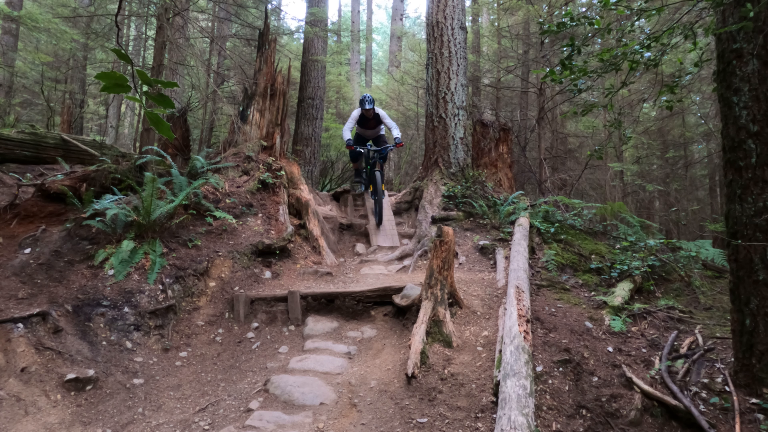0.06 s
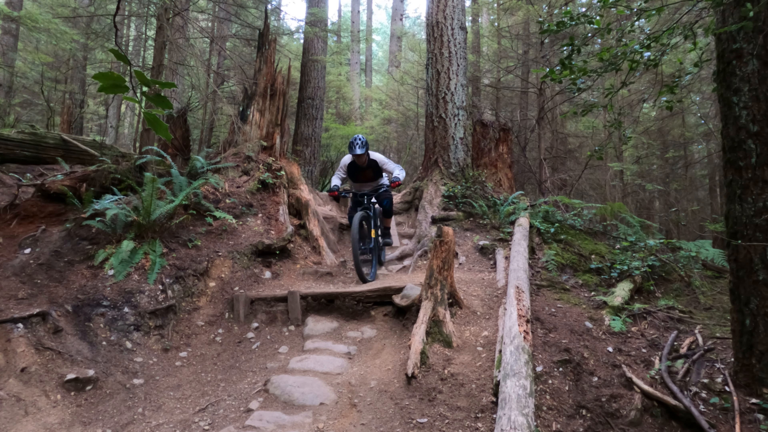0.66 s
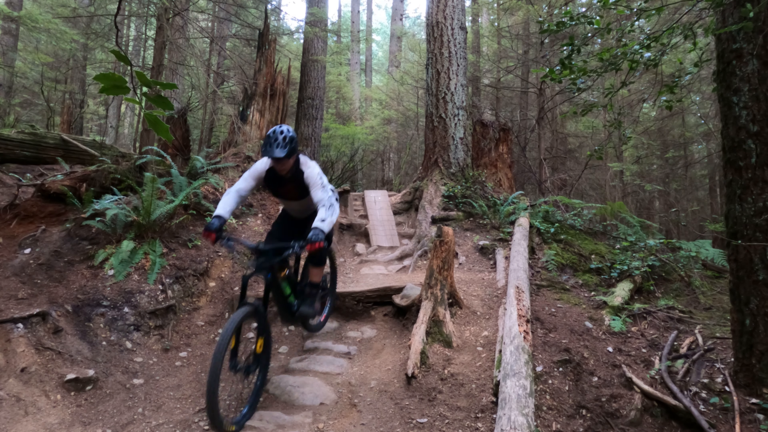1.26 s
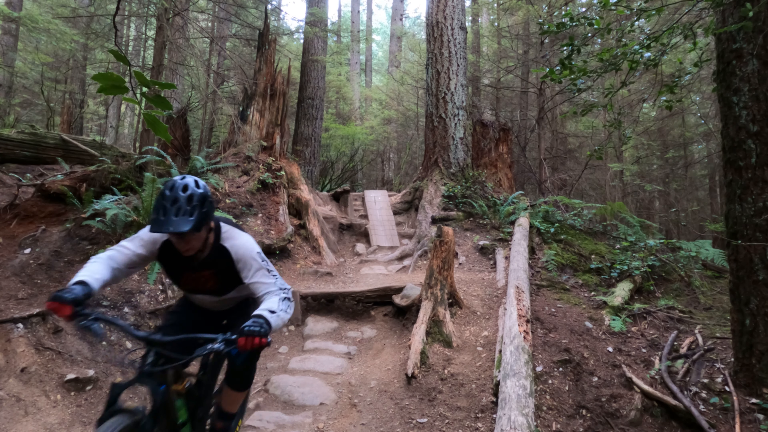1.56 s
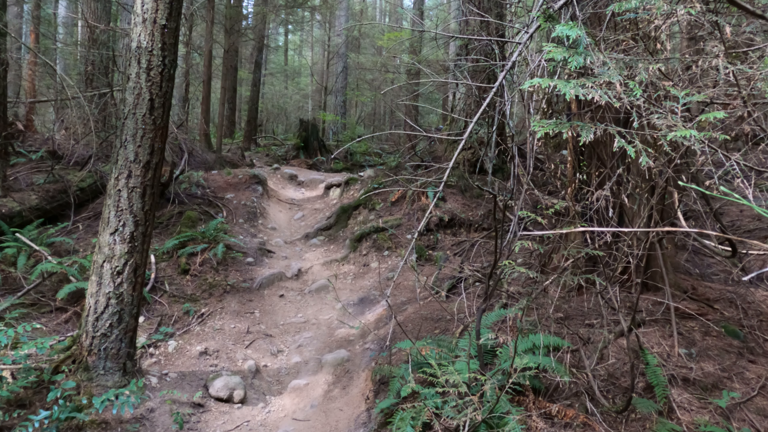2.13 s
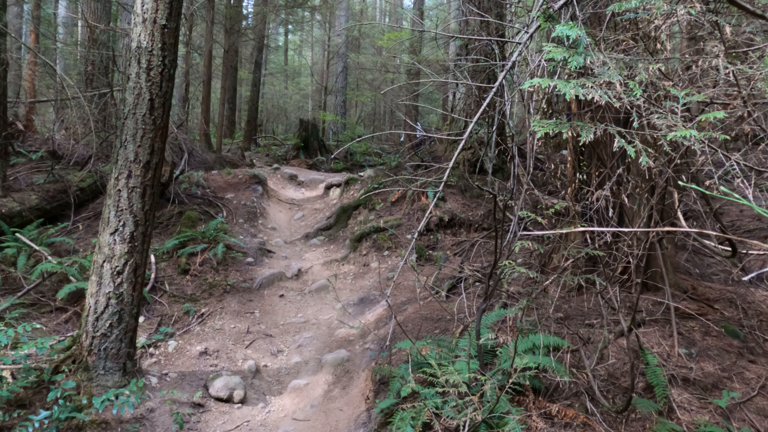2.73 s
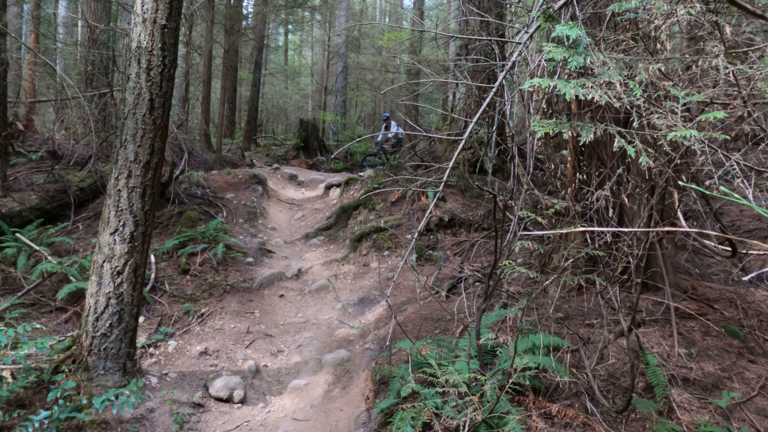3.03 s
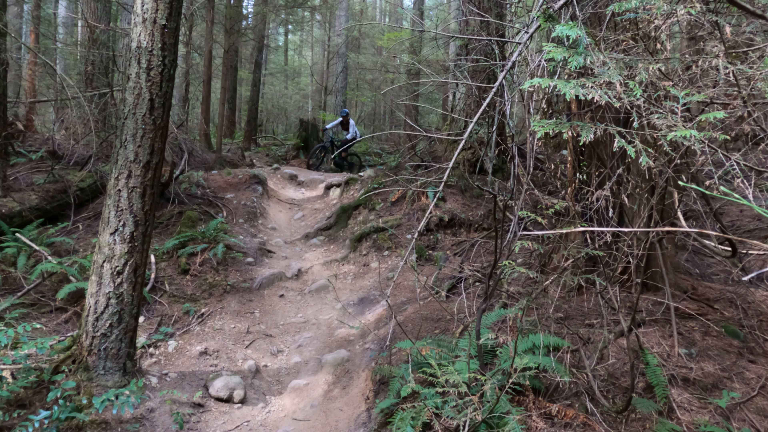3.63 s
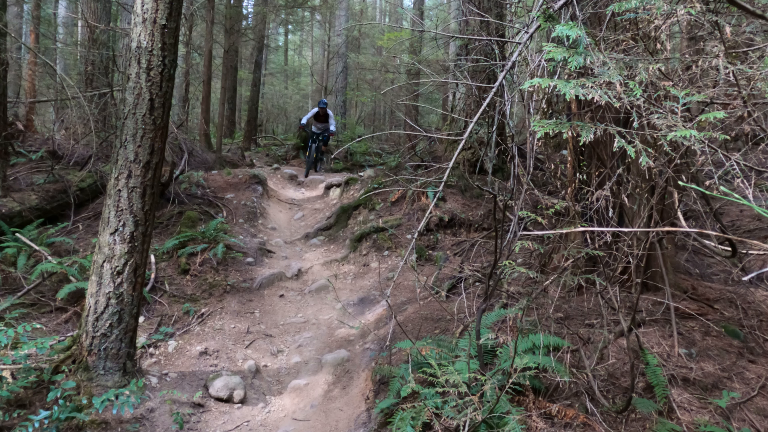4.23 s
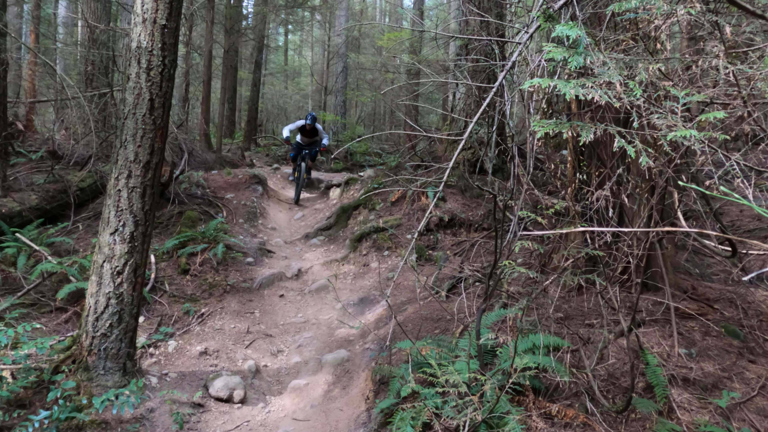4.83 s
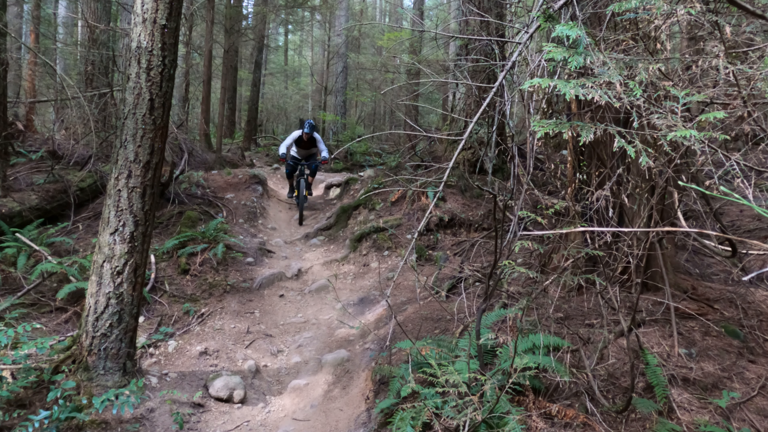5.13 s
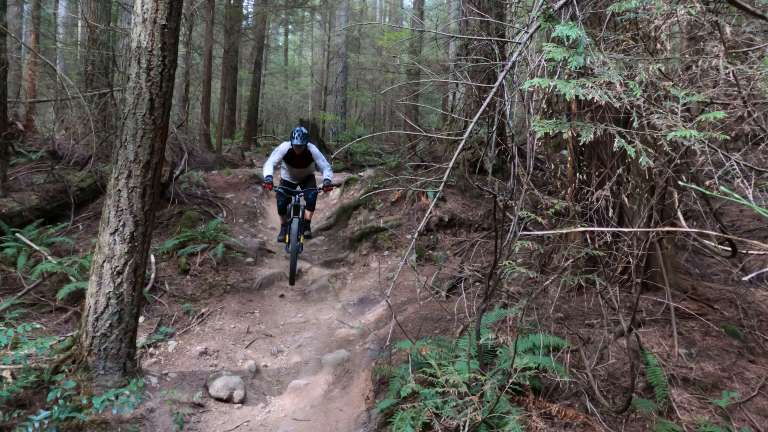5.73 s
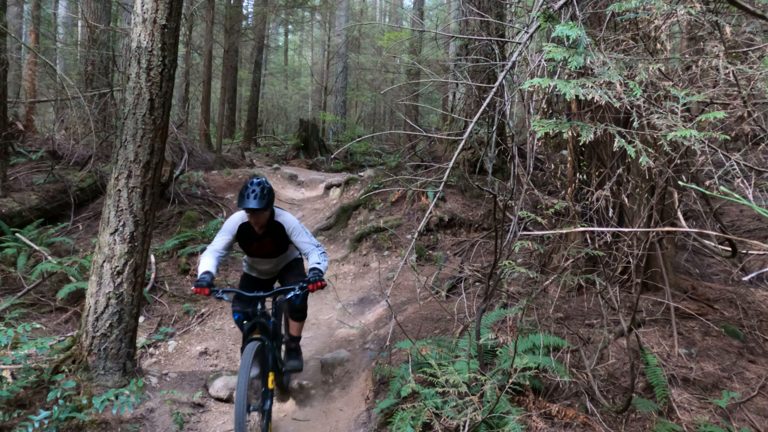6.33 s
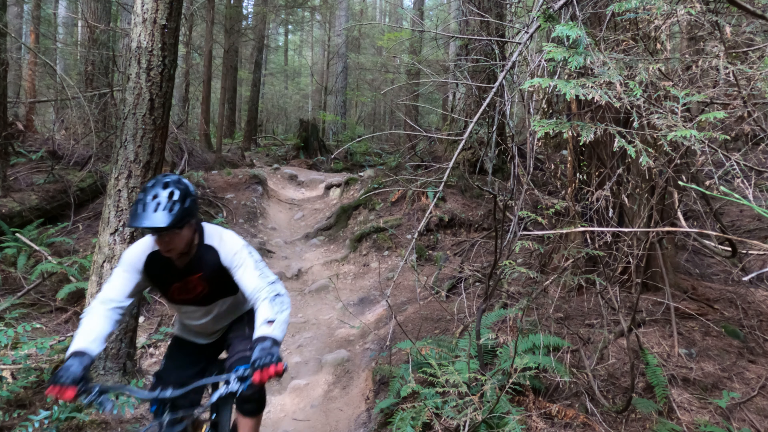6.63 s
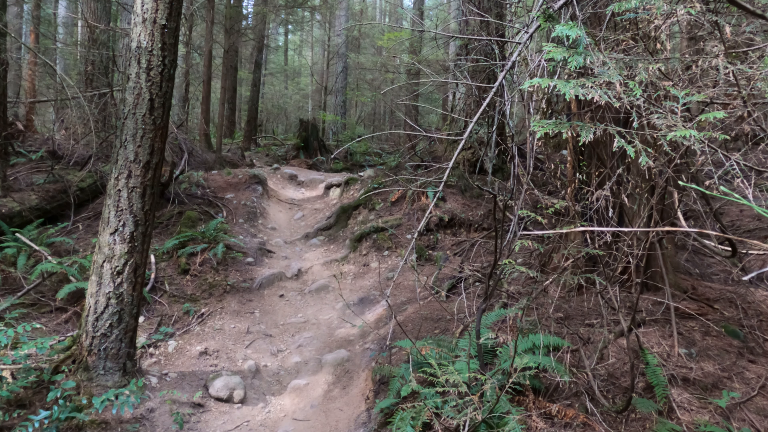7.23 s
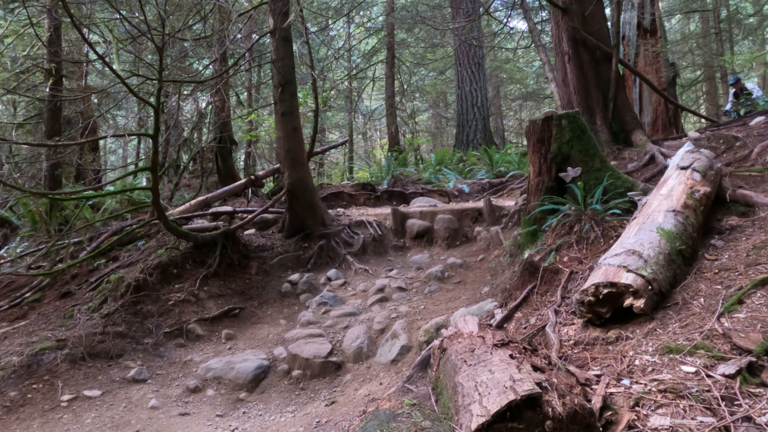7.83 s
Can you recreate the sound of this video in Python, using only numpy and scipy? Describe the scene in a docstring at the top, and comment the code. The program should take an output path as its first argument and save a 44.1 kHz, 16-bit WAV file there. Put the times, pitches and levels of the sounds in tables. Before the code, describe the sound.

A mountain bike coasts closer in a quiet forest, its hub ticking rapidly and its knobbly tyres humming briefly on a plank. From about 0.5 seconds the wheels knock on wood and crunch onto dirt. Between 1.4 and 2 seconds it passes close on the left, loud with deep thuds, short scuffs, clinks and the chain slapping the frame. A sudden cut at 2.1 seconds drops to forest hush, with a faint, distant landing and patter of dirt around 2.4. From about 3.2 seconds the buzzing hub emerges far away, and a brake chirps faintly at 4.1. From 4.7 seconds tyre crunch, rumble and chain clatter build steadily, peaking with heavy thumps around 6.8 to 7.1 as the bike passes on the left again. At 7.4 seconds another cut leaves only soft forest air and a far, low drone until about 8 seconds.

```python
"""First come knobbly tyres humming on a plank and the ticking hub of a mountain bike in a quiet forest.
The bike coasts closer and passes on the left: tyres crunch and scuff, wheels thud on the ground, and
the chain slaps the frame. After a sudden cut at about 2 s it comes out from behind the trees, its
brake chirps, and it passes again. A second cut leaves only the forest and a far, low drone."""
import sys
import numpy as np
from scipy import signal
from scipy.fft import rfft, irfft, next_fast_len
from scipy.io import wavfile
from scipy.ndimage import uniform_filter1d

SR = 44100
rng = np.random.default_rng(int(sys.argv[2]) if len(sys.argv) > 2 else 0)


def transcribe(signal):
    """Save signal, clipped to [-1, 1], as a 16-bit WAV file at the path in sys.argv[1]."""
    frames = np.atleast_2d(signal).T
    limited = np.clip(frames, -1, 1)
    pcm = np.round(limited * 32767).astype(np.int16)
    wavfile.write(sys.argv[1], SR, pcm)


N = 351477
TIME = np.arange(N) / SR

# Levels in the tables are relative: the functions may turn a whole sound up or down.
# the two cuts between the three scenes (time [s])
CUT_TIMES = [2.087, 7.357]
# how alike the left and right sides are (frequency [Hz], likeness [0 to 1])
STEREO_LIKENESS = [(50, 1), (200, 0.95), (700, 0.83), (1400, 0.78), (3000, 0.64), (6000, 0.79),
                   (10000, 0.84), (14000, 0.39)]
# tyre knobs humming on the plank (time [s], pitch [Hz], level [dB])
PLANK_HUM = [(0, 88.4, -53), (.13, 88, -65), (.17, 85.2, -48), (.3, 85.7, -47), (.38, 77, -45),
             (.45, 75.4, -65)]
# forest hush during the rides, then after them (frequency [Hz], level [dB])
EARLY_HUSH = [(25, -17), (60, -7.5), (110, -8.5), (180, -3.5), (330, -16.5), (480, -25), (750, -37),
              (1150, -30), (3000, -38.5), (4500, -42.5), (7400, -34.5), (8500, -48), (12000, -49),
              (15000, -67)]
LATE_HUSH = [(25, -17), (60, -2), (130, -4), (250, -12.5), (450, -21.5), (800, -42), (1150, -36.5),
             (2500, -44.5), (4200, -42.5), (7200, -38), (8500, -46.5), (12000, -52), (15000, -66.5)]
# tones of the far drone during the rides, then after them (pitch [Hz], level [dB])
EARLY_DRONE = [(107.7, -65.5), (172.3, -62.5), (339.1, -73.5)]
LATE_DRONE = [(64.6, -51.5), (123.8, -47.5), (247.6, -65.5)]
# each pass at its closest (time [s], distance [m], speed [m/s], left minus right [dB])
CLOSEST_POINTS = [(1.901, 1.87, 5.06, 2.5), (7.248, 1.41, 4.23, 4.5)]
# how fast the hub ticks, one list for each pass (time [s], rate [ticks/s])
TICK_RATES = [
    [(0, 22), (.22, 40), (.4, 41), (.6, 92), (1.13, 78), (1.35, 59), (2.08, 128)],
    [(3.2, 54), (3.6, 77.4), (3.9, 60.5), (4.08, 59.6), (4.7, 65), (5.25, 84), (5.5, 73), (6.5, 97),
     (7.0, 77), (7.24, 74), (7.33, 55)],
]
# moments when the hub goes briefly quieter (time [s], half length [s], depth [dB])
HUB_LEVEL_DIPS = [(0.42, 0.012, 29), (0.535, 0.033, 20), (5.501, 0.14, 4)]
# the hub's ticks, their high steel ring and the wheels' whirr (frequency [Hz], level [dB])
TICK_SPECTRUM = [(500, -35), (1100, -13), (1800, 1.5), (2700, 3), (3250, -10), (3500, 0), (3800, 2),
                 (4800, -0.5), (5600, -4), (7600, 0), (8500, -9), (10300, -7.5), (12200, -24.5),
                 (15500, -36)]
STEEL_SPECTRUM = [(6000, -6), (7500, 4.5), (8700, -5.5), (10200, -0.5), (11200, -10.5), (12100, -1.5),
                  (13000, -11.5), (15500, -23.5)]
WHIRR_SPECTRUM = [(600, -24.5), (1200, 0.5), (1900, 0.5), (2800, 2.5), (3250, -9), (3500, 4), (3800, -2),
                  (4700, 1), (5600, -4), (7500, -3.5), (8700, -9.5), (12200, -13.5), (15500, -38)]
# rough ground, as heard from 1 m (start [s], end [s], crunch level [dB], rumble level [dB])
ROUGH_PATCHES = [(0, .148, -45.5, -50), (0.159, .405, -38.5, -42), (0.433, 0.628, -31, -29.5),
                 (0.636, 1.0, -35, -30), (1.004, 1.068, -42.5, -38.5), (1.401, 1.46, -33, -32),
                 (1.454, 1.675, -27.5, -27.5), (1.673, 2.09, -35.5, -35), (3.195, 3.85, -44.5, -46),
                 (3.917, 4.58, -45, -41.5), (4.702, 4.981, -34.5, -31.5), (4.984, 5.48, -31.5, -29),
                 (5.529, 5.76, -32, -27), (5.751, 6.07, -34.5, -39.5), (6.071, 6.5, -29, -24),
                 (6.495, 6.75, -34.5, -31), (6.759, 6.93, -33.5, -29.5), (6.929, 7.36, -36, -38)]
# crushed grit, rumbling tyres and shaking earth (frequency [Hz], level [dB])
GRIT_SPECTRUM = [(250, -11), (420, -2.5), (560, -5.5), (710, 1.5), (830, -4.5), (1000, 0), (1700, -2.5),
                 (2500, -7.5), (4000, -11), (7000, -17), (14000, -34.5)]
TYRE_SPECTRUM = [(50, -2.5), (100, -6), (200, 1.5), (400, -9.5), (600, -15.5), (1200, -32)]
EARTH_SPECTRUM = [(18, 3.5), (45, 5.5), (80, -1), (160, -19.5), (500, -50)]
# echoes from the tree trunks (frequency [Hz], level [dB])
ECHO_SPECTRUM = [(120, -9), (500, -6.5), (1500, -3.5), (4000, -3.5), (9000, -9.5), (15000, -24)]
# wheels landing on planks, roots and earth (time [s], level [dB], pitch [Hz])
LANDINGS = [(.208, -37, 187), (.459, -24.5, 233), (.478, -32, 58), (.574, -24, 200), (.678, -30, 128),
            (.728, -25, 46.6), (.838, -30.5, 130), (0.929, -33, 40.7), (1.19, -37.5, 55),
            (1.405, -22.5, 40.2), (1.409, -19, 170), (1.465, -12, 50), (1.506, -16, 54), (1.597, -17, 108),
            (1.75, -24, 167.9), (1.941, -14, 139), (1.944, -17.5, 40.6), (2.003, -17, 75),
            (2.068, -15, 65.7), (2.368, -29, 50), (3.546, -37, 59.6), (4.541, -30, 180),
            (4.713, -29, 190.3), (4.75, -33.5, 200), (4.923, -25.5, 218), (4.995, -23.5, 133),
            (5.13, -26.5, 56.1), (5.263, -27, 45.6), (5.385, -30, 140), (5.539, -23.5, 61.6),
            (5.732, -24, 112), (5.822, -27, 44.8), (5.959, -31.5, 160), (6.036, -29, 120), (6.08, -22, 88),
            (6.108, -17, 166), (6.292, -24, 128), (6.322, -16.5, 139), (6.345, -26, 70.5),
            (6.552, -24.5, 109), (6.62, -20, 53), (6.72, -29, 130), (6.762, -9, 44.6), (6.778, -20, 120),
            (6.842, -19.5, 45.7), (7.044, -9.5, 46.3), (7.1, -24, 120)]
# short skids on wood or hard ground (middle time [s], half length [s], level [dB], pitch [Hz])
SKIDS = [(0.209, 0.018, -45.5, 1055), (.386, 0.017, -44, 1143), (0.48, 0.013, -34, 1046),
         (0.539, .012, -33, 1050), (0.572, .008, -36, 1079), (0.6, 0.0123, -33, 1000),
         (0.736, .012, -42, 901), (1.606, 0.02, -28.5, 291), (1.651, 0.011, -36.5, 351.4),
         (1.829, 0.0081, -32, 1000), (1.936, 0.0078, -38, 1050), (1.962, .025, -35, 1516),
         (2.007, .01, -27.5, 951), (2.021, .02, -30.5, 590), (4.914, 0.023, -44.5, 801),
         (4.933, 0.0144, -33.5, 234.7), (5.521, 0.0061, -37.5, 950), (6.134, 0.0245, -31.5, 399),
         (6.157, .018, -34, 680), (6.216, 0.026, -34.5, 720), (6.393, 0.029, -37.5, 720),
         (7.028, 0.0087, -31, 1049), (7.044, 0.0057, -21.5, 1093), (7.258, 0.013, -33.5, 1443),
         (7.33, .014, -33, 1150)]
# the chain's main slaps on the frame (time [s], level [dB], frequency [Hz], time to fade 60 dB [s])
CHAIN_SLAPS = [(.442, -21, 1270, 0.097), (.471, -24.5, 1140, 0.055), (.564, -22.5, 1100, .04),
               (.59, -21, 840, .06), (.644, -23.5, 1060, 0.022), (.72, -28, 1100, .05),
               (.755, -23.5, 1000, .041), (.796, -25, 1060, .049), (.839, -32, 905, 0.027),
               (.875, -28.5, 1120, .05), (.968, -29.5, 1060, 0.042), (1.402, -17, 2000, 0.056),
               (1.412, -22, 1850, .045), (1.443, -15.5, 2050, .025), (1.462, -15, 2200, 0.025),
               (1.467, -11.5, 800, 0.052), (1.48, -15.5, 2300, 0.037), (1.502, -16.5, 1500, 0.085),
               (1.529, -13, 1340, .06), (1.559, -20, 1390, .03), (1.593, -19, 1900, .04),
               (1.613, -16, 890, 0.042), (1.644, -26, 1400, .03), (1.692, -25.5, 1300, 0.084),
               (1.788, -18, 1200, 0.054), (1.806, -18, 1400, 0.06), (1.822, -12, 1310, .11),
               (1.858, -19.5, 1310, .05), (1.881, -32, 1700, .03), (1.935, -15.5, 1440, 0.13),
               (2.004, -9, 740, 0.057), (2.031, -14.5, 800, 0.056), (2.074, -11.5, 846, 0.057),
               (2.366, -41, 600, 0.11), (2.449, -36.5, 900, .04), (3.541, -32, 2170, .046),
               (3.641, -35.5, 1850, 0.12), (3.678, -33.5, 1730, 0.058), (3.799, -40.5, 1510, 0.017),
               (3.955, -35, 1698, .018), (4.183, -35, 1980, .015), (4.236, -39, 2433, 0.021),
               (4.452, -39, 1410, 0.12), (4.544, -34.5, 710, 0.088), (4.741, -30, 1179, 0.067),
               (4.774, -36, 1283, .04), (4.81, -33, 1130, 0.097), (4.858, -36, 700, 0.053),
               (4.989, -21.5, 1110, 0.055), (5.02, -27, 1190, .072), (5.125, -29, 800, .03),
               (5.24, -28.5, 1286, 0.056), (5.268, -31, 894, .04), (5.335, -31, 954, .05),
               (5.36, -33, 1300, .05), (5.405, -33, 700, 0.034), (5.448, -32, 910, 0.056),
               (5.538, -15.5, 750, .04), (5.572, -29, 1151, .06), (5.603, -28, 1300, 0.05),
               (5.626, -23.5, 610, 0.049), (5.729, -27, 676, 0.053), (5.817, -15.5, 677, .047),
               (5.842, -26, 945, 0.042), (5.888, -25, 730, .05), (5.906, -25, 900, .05),
               (5.955, -32, 1090, 0.041), (5.997, -22.5, 719, 0.032), (6.036, -29, 800, 0.025),
               (6.081, -23, 902, 0.039), (6.108, -14.5, 697, 0.055), (6.135, -21.5, 950, 0.081),
               (6.204, -21, 700, 0.077), (6.242, -35, 810, 0.048), (6.289, -15.5, 914, .06),
               (6.32, -20, 904, .053), (6.383, -25.5, 618, .05), (6.463, -23.5, 750, 0.051),
               (6.489, -22.5, 802, 0.044), (6.523, -14.5, 623, .035), (6.549, -26, 900, .05),
               (6.613, -20, 800, 0.041), (6.639, -24, 896, .06), (6.76, -12.5, 1000, 0.033),
               (6.772, -14.5, 1502, .08), (6.788, -18.5, 1100, 0.056), (6.812, -16.5, 1420, 0.056),
               (6.877, -14.5, 1000, .065), (6.91, -26, 1802, 0.027), (6.978, -23, 1903, 0.088),
               (6.997, -22, 1499, 0.077), (7.038, -5.5, 1200, 0.056), (7.068, -15.5, 2400, 0.034),
               (7.11, -17.5, 1600, .07), (7.152, -30, 1200, .07), (7.248, -24, 1700, .07),
               (7.295, -20.5, 1355, .035)]
# the tones the frame rings at (frequency [Hz], width [Hz], level [dB])
FRAME_TONES = [(595, 45, 11.5), (715, 74, 10), (917, 110, 4.5), (1080, 80, 10.5), (1347, 95, -0.5),
               (1548, 110, 8.5), (1850, 920, 0), (2050, 88, 1), (2420, 414, -9), (3590, 390, 0)]
# sharp hits of metal and flung grit (time [s], level [dB], frequency [Hz])
CLINK_HITS = [(.533, -38, 5400), (1.005, -31.5, 3630), (1.03, -38, 4700), (1.506, -23.5, 4960),
              (1.535, -26, 6000), (1.56, -26.5, 3710), (1.616, -26, 3500), (1.644, -31, 5600),
              (1.74, -23, 3600), (1.75, -25, 4480), (2.452, -47, 3700), (3.544, -41, 3714),
              (4.127, -40.5, 3660), (4.996, -33.5, 3580), (5.254, -35, 3900), (5.813, -33, 3700),
              (6.188, -32.5, 4300), (6.292, -35, 3500), (6.762, -25, 2970), (7.11, -18.5, 5060)]
# dirt thrown by a far landing, front wheel then rear (time [s], level [dB])
DIRT_THROWS = [(2.373, -62), (2.45, -54)]
# that dirt pattering down (frequency [Hz], level [dB])
PATTER_SPECTRUM = [(400, -15), (1200, 5.5), (3000, 1.5), (7000, -6), (9000, -15), (15000, -32)]
# a brake pad's chirp (time [s], level [dB])
BRAKE_CHIRP = [(4.10, -86), (4.135, -50), (4.2, -61), (4.24, -90)]


def from_db(db):
    """Turn decibels into a gain to multiply by."""
    return np.exp(np.asarray(db) * (np.log(10) / 20))


def rms_one(x):
    """Scale a signal so its average strength (rms) is 1."""
    return x / np.sqrt(np.mean(x ** 2) + 1e-20)


def peak_one(x):
    """Scale a hit so its loudest 10 ms have an rms of 1."""
    return x / np.sqrt(uniform_filter1d(x ** 2, SR // 100).max() + 1e-20)


def in_time(rows):
    """Join a table's rows into a curve over time for each column."""
    times, *columns = np.transpose(rows)
    return [np.interp(TIME, times, column) for column in columns]


def at_hz(points, hz):
    """Read between a table's points on a log-frequency scale."""
    frequencies, values = np.transpose(points)
    return np.interp(np.log(hz + 1), np.log(frequencies), values)


def drift(turns_per_s):
    """A random wobble with an rms of 1."""
    points = rng.standard_normal(4000)
    return rms_one(np.interp(TIME * turns_per_s, np.arange(len(points)), points))


def swell(s, half_length_s):
    """A smooth bump of height 1 around time s."""
    return np.exp(-np.minimum(((TIME - s) / half_length_s) ** 2, 20))


def add(track, s, sound):
    """Mix a sound in at time s; it stops at the next cut."""
    start = max(round(s * SR), 0)
    end = min([start + len(sound), N] + [round(cut * SR) for cut in CUT_TIMES if cut > s])
    track[start:end] += sound[:end - start]


def resonate(x, hz, width_hz):
    """Make a signal ring at one frequency; narrower rings longer."""
    r = np.exp(-np.pi * width_hz / SR)
    gain = (1 - r * r) / 2
    return signal.lfilter([gain, 0, -gain], [1, -2 * r * np.cos(2 * np.pi * hz / SR), r * r], x + 1e-18)


def band(x, low_hz, high_hz):
    """Gently filter away what lies outside two frequencies."""
    return signal.sosfilt(signal.butter(2, [low_hz, high_hz], "band", fs=SR, output="sos"), x + 1e-18)


def coloured(pair, spectrum):
    """Turn two unrelated signals into stereo with a given spectrum, less alike in the treble."""
    size = next_fast_len(N)
    hz = np.arange(size // 2 + 1) * SR / size
    low, high = spectrum[0][0], spectrum[-1][0]
    roll_off = (hz / np.maximum(hz, low) * high / np.maximum(hz, high)) ** 2   # 12 dB an octave
    mid, side = rfft(pair, size) * from_db(at_hz(spectrum, hz)) * roll_off
    alike = at_hz(STEREO_LIKENESS, hz)
    left_right = np.sqrt(1 + alike) * mid + np.sqrt(1 - alike) * side * [[1], [-1]]
    return rms_one(irfft(left_right, size)[:, :N])


def noise(spectrum):
    """Smooth stereo noise with a given spectrum."""
    return coloured(rng.standard_normal((2, N)), spectrum)


def grains(per_s, spread_db):
    """Two streams of random clicks, a few much louder than the rest."""
    sizes = from_db(spread_db * np.minimum(rng.exponential(1, N), 4))
    return (rng.random(N) < per_s / SR) * sizes * rng.standard_normal((2, N))


def rattle(t60, taps_per_s, first, size=SR // 2):
    """One hit, then a flurry of small taps that fades 60 dB in t60 seconds."""
    taps = rng.standard_normal(size) * (rng.random(size) < taps_per_s / SR)
    taps[0] = first
    return taps * from_db(-60 * TIME[:size] / t60) + 1e-18


def hum(hz, db, wander, waver_db):
    """A low tone that wavers in pitch and loudness."""
    phase = 2 * np.pi * np.cumsum(hz * (1 + wander * drift(19))) / SR
    return np.sqrt(2) * np.sin(phase) * from_db(db + waver_db * drift(7.8))


def plank():
    """Tyre knobs drum on the board until the wheel leaves it."""
    hz, db = in_time(PLANK_HUM)
    return hum(hz, db, wander=0.028, waver_db=4) * (TIME < PLANK_HUM[-1][0])


def forest(rides_over):
    """A soft hush and a far drone, both louder in the last scene."""
    late_drone = sum(hum(hz, db, wander=0.0038, waver_db=1.5) for hz, db in LATE_DRONE)
    early_drone = sum(hum(hz, db, wander=0.015, waver_db=2.5) for hz, db in EARLY_DRONE)
    early = from_db(-56.5) * noise(EARLY_HUSH) + early_drone
    late = from_db(-50) * noise(LATE_HUSH) + late_drone
    return np.where(rides_over, late, early)


def ride(emerges_s=3.5, hidden_db_per_s=23):
    """The bike rides straight by, louder when nearer; the second pass starts behind trees."""
    second_pass = (TIME >= CUT_TIMES[0]).astype(int)
    closest_s, closest_m, speed, pan_db = np.transpose(CLOSEST_POINTS)[:, second_pass]
    distance_m = np.hypot(closest_m, speed * (TIME - closest_s))
    alongside = (closest_m / distance_m) ** 2   # 0 far away, 1 right beside the listener
    hidden_db = hidden_db_per_s * np.maximum(emerges_s - TIME, 0) * second_pass
    nearness = from_db(-hidden_db) / distance_m * (TIME < CUT_TIMES[1])
    return distance_m, nearness, alongside, pan_db * alongside


def freehub(nearness, alongside, level_db=-40.5, rise_s=0.0004, fade_s=0.002):
    """Small catches in the hub tick over a toothed steel ring while the wheels whirr."""
    rate, = in_time([point for run in TICK_RATES for point in run])
    turning = 1 / (1 + ((TIME - 3.725) / 0.31) ** 8)   # near 3.7 s the bike turns and shows its hub
    side_on = np.maximum(alongside, turning)
    dips_db = sum(db * swell(s, half_s) for s, half_s, db in HUB_LEVEL_DIPS)
    teeth_passed = np.cumsum(rate * (1 + 0.02 * drift(40))) / SR
    age = teeth_passed % 1 / rate
    strength = from_db(2.5 * np.clip(rng.standard_normal(2000), -1.5, 1.5))[teeth_passed.astype(int)]
    ticks = rms_one(strength * (1 - np.exp(-age / rise_s)) * np.exp(-age / fade_s))
    steel_db = -12 + 10.5 * side_on   # brightest from the side
    rasp = noise(TICK_SPECTRUM) + from_db(steel_db) * noise(STEEL_SPECTRUM)
    blur = np.clip(rate / 75, 0.9, 1.6)   # at speed the ticks sink into the whirr
    clarity = from_db(0.75 * side_on)   # from the side they stand out more
    whirr = blur / clarity * from_db(1.83) * noise(WHIRR_SPECTRUM)
    gain = nearness * from_db(level_db + 2.5 * turning - dips_db)
    return gain * (clarity * ticks * rasp / blur ** 2 + whirr)


def roughness(smooth_db=-54, grip_s=0.0019):
    """Strength of crunch and rumble: both jump up on each rough patch of ground."""
    gains = np.full((2, N), from_db(smooth_db))
    for start, end, crunch_db, rumble_db in ROUGH_PATCHES:
        gains[:, (TIME >= start) & (TIME < end + grip_s)] = from_db([[crunch_db], [rumble_db]])
    keep = np.exp(-1 / (grip_s * SR))   # softens each step
    return signal.lfilter([1 - keep], [1, -keep], gains)


def crunch(strength):
    """The tyres crush grit in clumps."""
    grit = grains(per_s=3000, spread_db=2)
    clumps_db = 3.5 * drift(90) + 1.9 * drift(20)
    return strength * from_db(clumps_db) * coloured(grit, GRIT_SPECTRUM)


def rumble(strength):
    """Tyres rumble over bumps and shake the earth, which fades faster with distance."""
    tyres = from_db(-1.5 + 3 * drift(28)) * strength * noise(TYRE_SPECTRUM)
    earth = from_db(7) * strength ** 1.138 * noise(EARTH_SPECTRUM)
    return tyres + earth


def tree_echoes(x, level_db=-20.5, t60=0.44, rise_s=0.0045):
    """Sound bounces off the trunks and leaves a thin, dull tail."""
    age = TIME[:SR]
    echoes = coloured(grains(per_s=1500, spread_db=3), ECHO_SPECTRUM)[:, :SR]
    echoes *= from_db(-60 * age / t60) * (1 - np.exp(-age / rise_s))
    echoes /= np.sqrt(np.sum(echoes ** 2) / 2)
    return from_db(level_db) * signal.fftconvolve(x.mean(axis=0)[None], echoes, axes=1)[:, :N]


def thuds(rise_s=0.005, slap_db=-10):
    """The ground gives and springs back under a wheel, with a hollow slap from the tyre."""
    out, age = np.zeros(N), TIME[:SR // 2]
    for s, db, hz in LANDINGS:
        t60 = 0.18 * (50 / hz) ** 0.97   # higher thuds die sooner
        rebound = np.sin(2 * np.pi * hz * age) * from_db(-60 * age / t60) * (1 - np.exp(-age / rise_s))
        hollow = peak_one(band(rattle(t60=0.099, taps_per_s=2500, first=3.8), 88, 312))
        add(out, s, from_db(db) * (rebound + from_db(slap_db) * hollow))
    return out


def skids(slips_per_s=1500, pitch_sag=0.16, width_hz=380, overtone_ratio=1.55, overtone_db=-7.5):
    """Tyre knobs slip and catch, making a rough squawk that falls in pitch as they grip again."""
    out, size = np.zeros(N), SR // 6
    middle_s = size / SR / 2
    smoothing = signal.butter(2, width_hz / 2, fs=SR, output="sos")
    for s, half_s, db, hz in SKIDS:
        progress = np.clip((TIME[:size] - middle_s) / half_s, -3, 3)
        slips = rng.standard_normal(size) * (rng.random(size) < slips_per_s / SR)
        slips *= np.exp(-progress ** 2)
        random_phases = np.exp(2j * np.pi * rng.random((2, size)))
        flutter = signal.sosfilt(smoothing, slips * random_phases + 1e-18)
        phase = 2 * np.pi * np.cumsum(hz * (1 - pitch_sag * progress / 2)) / SR
        tone = flutter[0] * np.exp(1j * phase)
        overtone = from_db(overtone_db) * flutter[1] * np.exp(1j * overtone_ratio * phase)
        add(out, s - middle_s, from_db(db) * peak_one((tone + overtone).real))
    return out


def small_slaps(strength, per_s=22, spread_octaves=0.27, t60=0.027):
    """Extra rows like CHAIN_SLAPS at random times, louder on near, rough ground."""
    times = rng.uniform(0, CUT_TIMES[1], 300)
    pitches = np.clip(rng.standard_normal((len(times), 2)), -2, 2)[:, 1]
    levels_db = 20 * np.log10(strength[(times * SR).astype(int)] + 1e-9) + 1.5
    rows = [(s, db, 1000 * 2 ** (spread_octaves * pitch), t60)
            for s, db, pitch in zip(times, levels_db, pitches)]
    return rows[:round(per_s * CUT_TIMES[1])]


def chain_slap(t60, rise_s=0.002, bounce_s=0.027, bounce_db=-15.5):
    """The chain lands link by link, then bounces once."""
    size = SR // 8
    landing, bounce = (rattle(t60, taps_per_s=2400, first=1.8, size=size) for _ in range(2))
    delay = round(bounce_s * rng.uniform(0.7, 1.3) * SR)
    force = 1 - 0.38 * np.exp(-TIME[:size] / rise_s)   # the first link lands more softly
    return landing * force + from_db(bounce_db) * np.pad(bounce, (delay, 0))[:size]


def clatter(slaps, level_db=-12.5):
    """The chain slaps the frame; where it hits decides which tones ring most."""
    out = np.zeros(N)
    for s, db, hz, t60 in slaps:
        hit = chain_slap(t60)
        shares = from_db(rng.normal(0, 2, len(FRAME_TONES)))
        ringing = sum((-1) ** k * shares[k] * from_db(tone_db) * resonate(hit, tone_hz, width_hz)
                      for k, (tone_hz, width_hz, tone_db) in enumerate(FRAME_TONES))
        knock = from_db(-3) * band(hit, 320, 2800)
        body = band(resonate(ringing + knock, hz, width_hz=950), 260, 3300)
        crack = from_db(-24.5 + 0.4 * (db + 19)) * band(hit, 200, 4500)   # harder slaps are brighter
        add(out, s, from_db(db + level_db) * peak_one(body + crack))
    return out


def clinks(level_db=-8.5):
    """Metal and flung grit hit with a short, bright ring."""
    out = np.zeros(N)
    for s, db, hz in CLINK_HITS:
        hit = band(rattle(t60=0.065, taps_per_s=7000, first=1.5), 1600, 7800)
        add(out, s, from_db(db + level_db) * peak_one(resonate(hit, hz, width_hz=2600)))
    return out


def stirred_air(nearness, level_db=-36):
    """Air stirred by the bike buffets each microphone separately, and only from close by."""
    return from_db(level_db) * nearness ** 2 * rms_one(band(rng.standard_normal((2, N)), 24, 80))


def dirt_spray(t60=0.75):
    """Thrown dirt patters down and dies away."""
    patter = coloured(grains(per_s=6000, spread_db=1.5), PATTER_SPECTRUM)
    return patter * sum((TIME > s) * from_db(db - 60 * np.abs(TIME - s) / t60) for s, db in DIRT_THROWS)


def brake(hz=1500, width_hz=260):
    """A pad rubs the brake disc and makes it ring roughly for a moment."""
    db, = in_time(BRAKE_CHIRP)
    rubbing = rng.standard_normal(N)
    return from_db(db) * rms_one(resonate(resonate(rubbing, hz, width_hz), hz, width_hz))


def scene():
    """Two rides past, then the forest alone; each cut stops the echoes too."""
    part = np.searchsorted(CUT_TIMES, TIME)   # 0 and 1 are the rides, 2 is the forest alone
    distance_m, nearness, alongside, pan_db = ride()
    gritty, bumpy = nearness * roughness()
    background = forest(part == 2)
    centred = rumble(bumpy) + thuds() + plank() + dirt_spray() + brake()
    panned = freehub(nearness, alongside) + crunch(gritty) + skids() + clinks()
    panned += clatter(list(CHAIN_SLAPS) + small_slaps(gritty))
    bike = centred + panned * from_db(pan_db / 2 * [[1], [-1]])
    to_trees = bike * distance_m ** 0.29   # from further away, more of the sound is echo
    rides = sum((bike + tree_echoes(to_trees * (part == k))) * (part == k) for k in range(2))
    return rides + stirred_air(nearness) + background


def record(dry):
    """The microphone's case rings at one pitch; the deepest bass and highest treble are cut."""
    ringing = dry + from_db(-3) * resonate(dry, hz=3498, width_hz=70)
    bass_cut = signal.sosfilt(signal.butter(2, 16, "high", fs=SR, output="sos"), ringing)
    return signal.sosfilt(signal.ellip(10, 0.1, 90, 15500, fs=SR, output="sos"), bass_cut)


dry = scene()
out = record(dry)
transcribe(out)
```